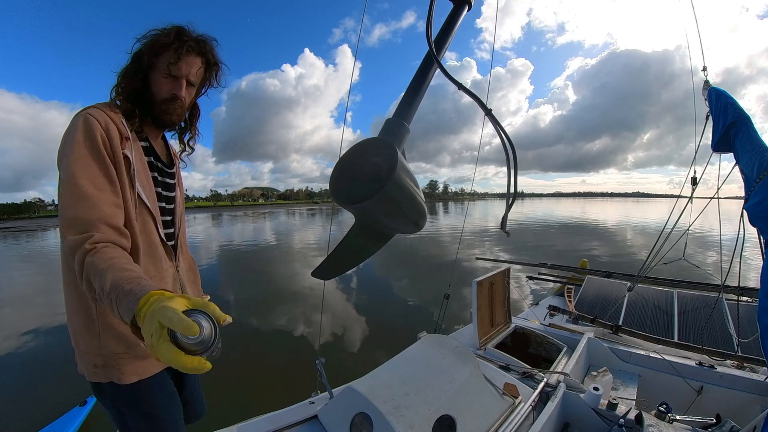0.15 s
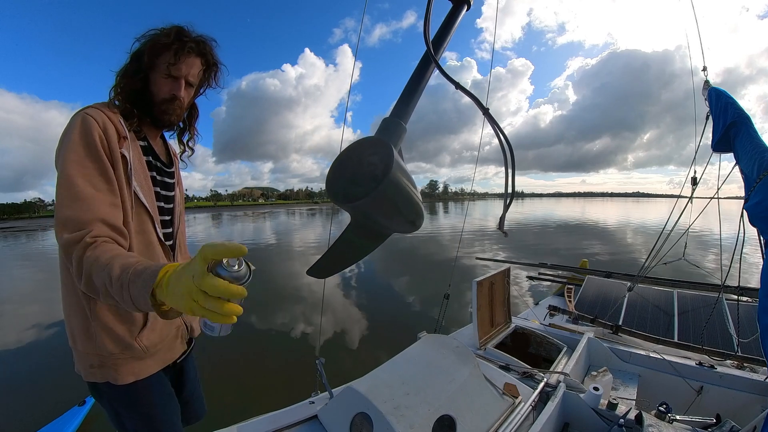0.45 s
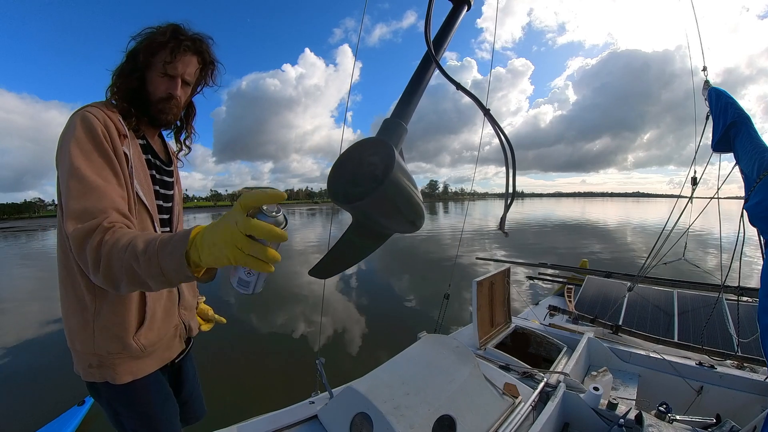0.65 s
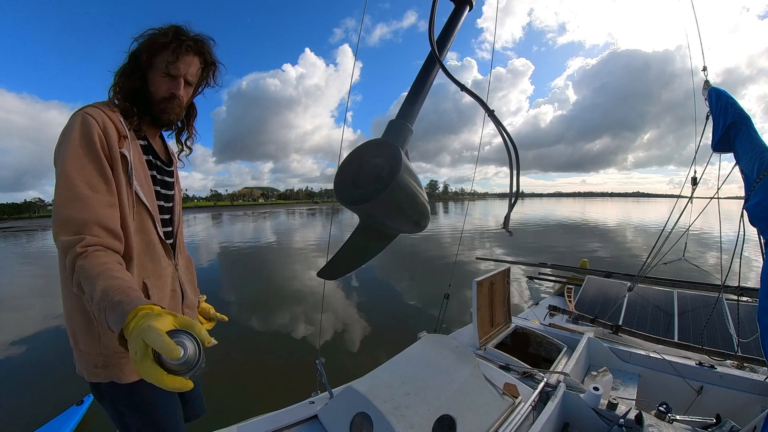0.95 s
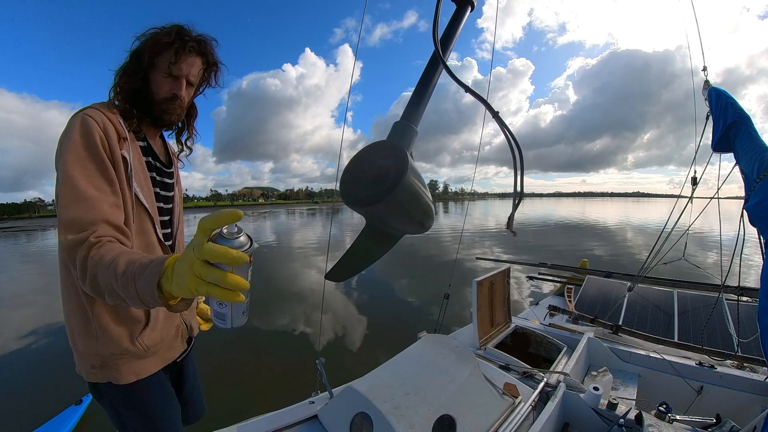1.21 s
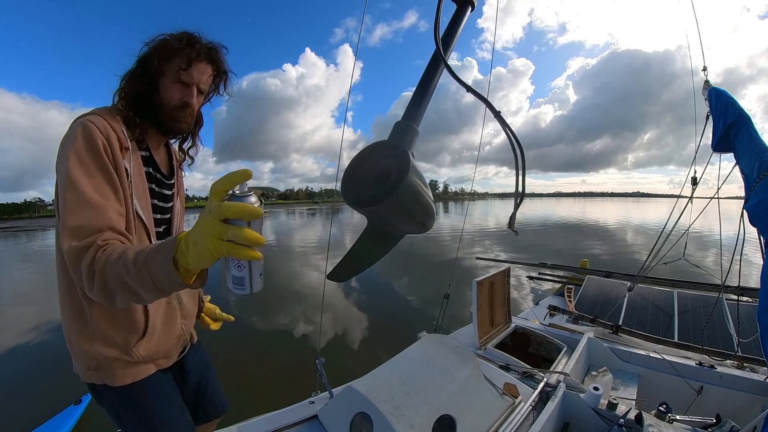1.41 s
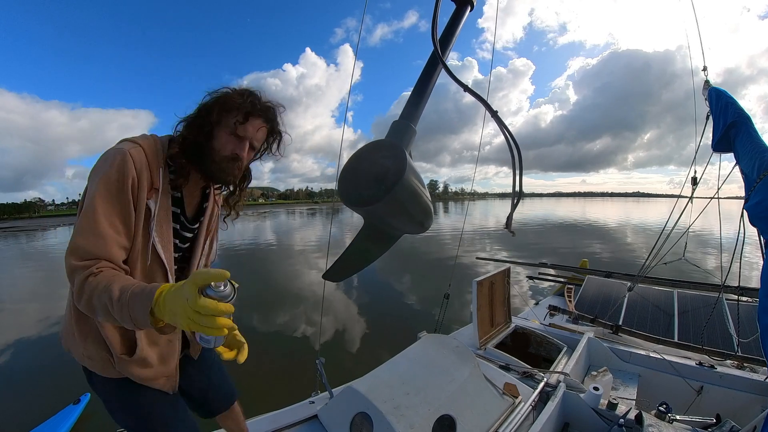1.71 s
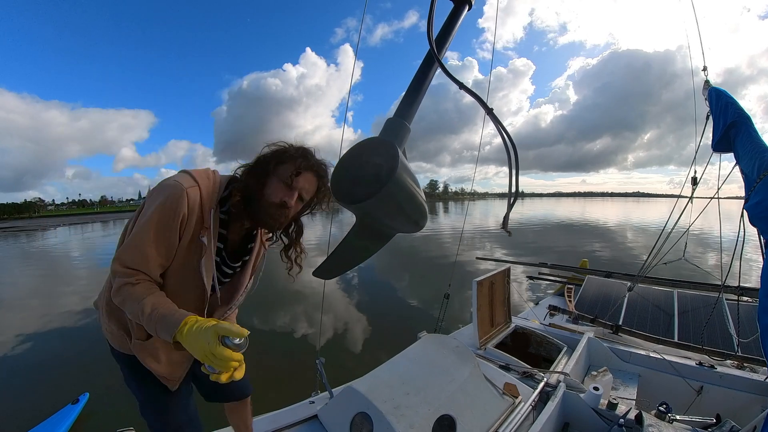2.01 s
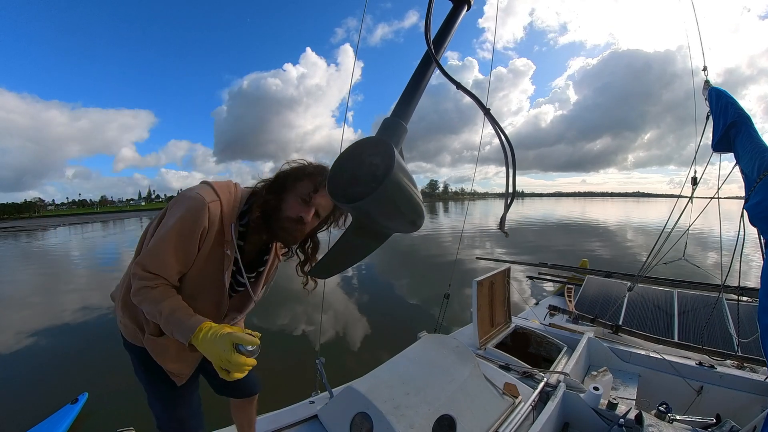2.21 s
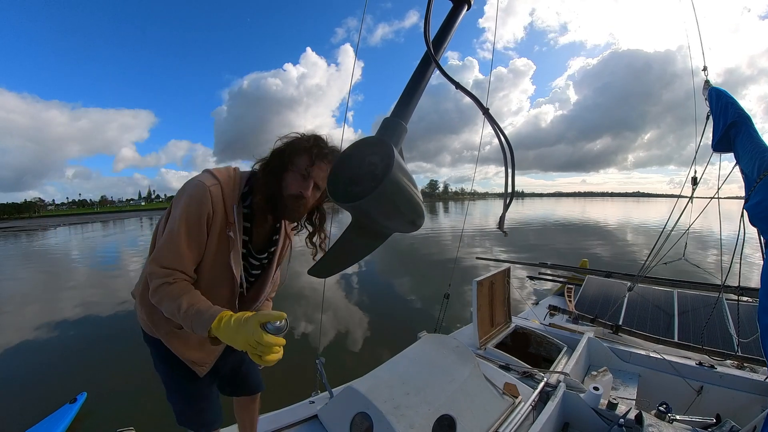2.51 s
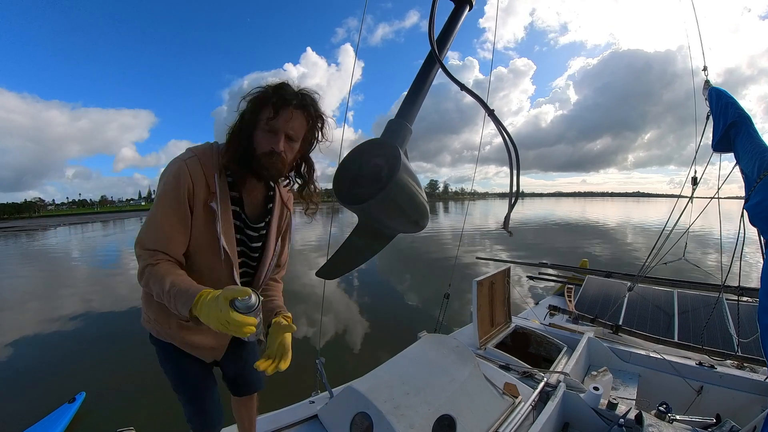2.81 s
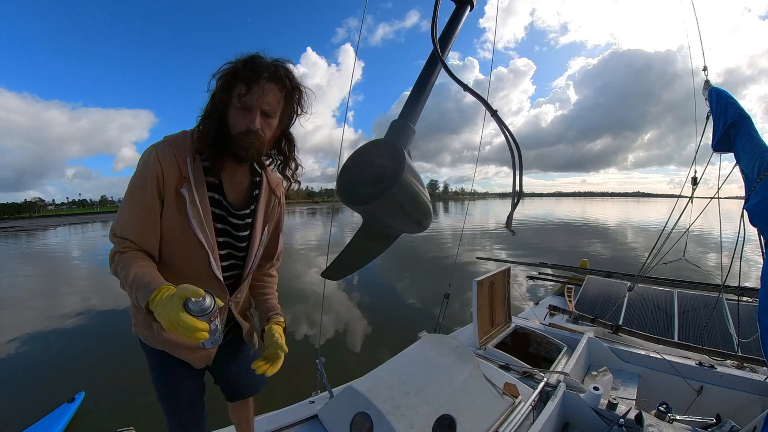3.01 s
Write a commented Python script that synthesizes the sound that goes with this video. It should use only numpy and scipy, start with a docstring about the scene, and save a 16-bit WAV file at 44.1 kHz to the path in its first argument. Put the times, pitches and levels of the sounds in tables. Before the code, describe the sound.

Close to the microphone on a boat deck, a spray can swishes and its ball rattles in tight metallic clusters; a far bird whistles, shoes scuff and a heel thumps, with low wind and a faint distant engine.

```python
"""A spray can is shaken on the deck of a boat on calm water, while wind and water rumble over a far engine.
Two hard down strokes make the paint rush and hiss (grainy coloured noise). After each, on the return,
the mixing ball rolls (dense ticks through resonances) and clacks (clicks ringing the can).
After the second stroke a far bird whistles once (a gliding sine), and the ball clacks again.
Soles and gear scuff the deck; near the end a heel thumps it, ringing its hollow modes."""
import sys
import numpy as np
from scipy import signal
from scipy.fft import rfft, irfft
from scipy.io import wavfile
from scipy.ndimage import uniform_filter1d

SR = 44100
rng = np.random.default_rng(int(sys.argv[2]) if len(sys.argv) > 2 else 0)


def transcribe(signal):
    """Save signal, clipped to [-1, 1], as a 16-bit WAV file at the path in sys.argv[1]."""
    frames = np.atleast_2d(signal).T
    limited = np.clip(frames, -1, 1)
    pcm = np.round(limited * 32767).astype(np.int16)
    wavfile.write(sys.argv[1], SR, pcm)


N = 138915  # length in samples


def from_db(db):
    """Turn decibels into a gain."""
    return 10 ** (np.asarray(db) / 20)


def rms_one(x):
    """Scale a sound to an rms of 1."""
    return x / np.sqrt(np.mean(x ** 2) + 1e-20)


def in_time(rows, outside=None):
    """Read each column of a table at every sample, with straight lines between the rows."""
    times, *columns = np.transpose(rows)
    now = np.arange(N) / SR
    return [np.interp(now, times, column, outside, outside) for column in columns]


def drift(rate_hz):
    """Smooth random wandering with a spread of 1; a higher rate wanders faster."""
    step = 40  # samples between the computed points
    r = np.exp(-2 * np.pi * rate_hz * step / SR)
    white = rng.standard_normal(N // step + 2002)
    slow = signal.lfilter([1], [1, -2 * r, r * r], white)[2000:]  # skip the filter's start
    slow = rms_one(slow - slow.mean())
    return np.interp(np.arange(N) / step, np.arange(len(slow)), slow)


def ring(clicks, hz, t60):
    """A resonance: each unit click starts a sine of height 1 that fades by 60 dB in t60 seconds."""
    r = from_db(-60 / (t60 * SR))
    w = 2 * np.pi * hz / SR
    return signal.lfilter([0, np.sin(w)], [1, -2 * r * np.cos(w), r * r], clicks + 1e-18)


def band(x, low_hz, high_hz):
    """Keep the pitches between two limits."""
    return signal.sosfilt(signal.butter(2, [low_hz, high_hz], "band", fs=SR, output="sos"), x)


def coloured(spectrum):
    """Steady noise with a given balance of pitches, at rms 1."""
    hz, db = np.transpose(spectrum)
    bins_hz = np.arange(1, N // 2 + 2) * SR / N
    gain = from_db(np.interp(np.log(bins_hz), np.log(hz), db))
    return rms_one(irfft(rfft(rng.standard_normal(N)) * gain, N))


def banded_noise(spectrum, patchy_db, rate_hz, count):
    """Noise in bands of 1/count octave, which swell partly together and partly alone; rms 1."""
    hz, db = np.transpose(spectrum)
    octaves = np.log2(hz[-1] / hz[0])
    edges = hz[0] * 2 ** np.arange(0, octaves + .5 / count, 1 / count)
    together = drift(rate_hz)
    white = rng.standard_normal((2, N + 8000))  # neighbouring bands use different noise
    out = 0
    for k, (low, high) in enumerate(zip(edges, edges[1:])):
        level = np.interp(np.log(low * high) / 2, np.log(hz), db)
        swell = patchy_db * (0.91 * together + drift(rate_hz))
        out = out + from_db(level + swell) * band(white[k % 2], low, high)[-N:]
    return rms_one(out)


def add(out, s, sound):
    """Mix a sound in at time s."""
    i = int(s * SR)
    out[i:i + len(sound)] += sound[:N - i]


def engine():
    """A far engine: noise through narrow resonances gives wavering multiples of its firing rate."""
    # multiples 2 to 6 of the firing rate: (time [s], level [dB] of each of the five)
    drone_levels = [(0, -63, -65, -52.5, -61.5, -57), (.6, -67.5, -54.5, -53.5, -62.5, -62.5),
                    (1.2, -57, -61.5, -51.5, -61.5, -64.5), (1.8, -58, -58.5, -66, -64.5, -59),
                    (2.4, -58, -54, -62, -58.5, -58), (3.15, -62, -55.5, -58.5, -60.5, -61)]
    firing_hz, width_hz = 27.85, 5
    t60 = np.log(1000) / (np.pi * width_hz)
    out = 0
    for k, db in enumerate(in_time(drone_levels)):
        tone = ring(rng.standard_normal(N + SR), firing_hz * (k + 2), t60)[SR:]  # already ringing
        out = out + from_db(db) * rms_one(tone)
    return out


def wind():
    """Wind and water: lumpy noise in three registers, each rising and falling on its own."""
    # (time [s], deep rumble [dB], rumble [dB], rustle [dB])
    gusts = [(0.0, -66.5, -51, -65.5), (0.39, -71.5, -50.5, -63.5), (0.6, -68, -49.5, -68),
             (0.97, -61.5, -51.5, -66), (1.39, -62, -61.5, -70), (1.89, -62, -48, -67.5),
             (2.01, -65, -52.5, -67.5), (2.38, -65.5, -51.5, -71.5), (2.62, -60, -46.5, -60.5),
             (2.8, -65, -51, -67), (2.97, -64, -52.5, -65), (3.15, -51, -51, -65)]
    # colour of each register in the same order: (pitch [Hz], level per Hz [dB])
    registers = [
        [(13, -38.5), (22, -12), (60, 0), (78, -33.5), (130, -120)],
        [(35, -31), (60, -3), (114, 2), (172, -8.5), (220, -17.5), (290, -39), (480, -120)],
        [(130, -28.5), (220, -4), (257, -2.5), (383, -17), (429, -12.5), (984, -25), (1200, -36), (1560, -66),
         (2640, -120)],
    ]
    out = 0
    for db, colour in zip(in_time(gusts), registers):
        out = out + from_db(db) * banded_noise(colour, patchy_db=2.5, rate_hz=5.1, count=3)
    return out


def far_hiss():
    """Far air and water: a steady coloured noise."""
    # (pitch [Hz], level per Hz [dB])
    air_colour = [(530, -28.5), (900, -1.5), (1020, -9), (1280, -7.5), (3230, -6), (5890, -5.5),
                  (7990, -13.5), (8560, -26), (9440, -28.5), (12300, -55.5), (20800, -120)]
    return from_db(-79.5) * coloured(air_colour)


def bird():
    """A far bird: one arched whistle, a gliding sine with a faint, unsteady octave above."""
    # (time [s], pitch [Hz], level [dB])
    whistle = [(1.405, 1816, -97), (1.417, 1920, -72.5), (1.433, 2020, -73), (1.473, 2087, -66),
               (1.571, 2036, -69.5), (1.619, 1916, -71), (1.625, 1884, -89), (1.67, 1930, -85)]
    phase = 2 * np.pi * np.cumsum(in_time(whistle)[0]) / SR
    octave_gain = from_db(-22 + 6.0 * drift(30.0))
    octave = octave_gain * np.sin(2 * phase + 2.4 * drift(40.0))
    level_db = in_time(whistle, -200)[1]  # silent before and after
    return np.sqrt(2) * from_db(level_db) * (np.sin(phase) + octave)


def rub(rows, ticks_per_s):
    """Something runs over a body: dense uneven ticks ring one region of it, under a short swell."""
    attack_s, edge_s = 0.0014, 0.018  # edge_s: half the length of the fade-out
    out = np.zeros(N)
    size = int(.3 * SR)
    for s, length, db, hz, t60 in rows:
        t = np.arange(int((length + .05) * SR)) / SR
        ticks = (rng.random(size) < ticks_per_s / SR) * rng.standard_normal(size)
        fade_in = np.clip(t / attack_s, 0, 1)
        fade_out = np.clip((length + edge_s - t) / (2 * edge_s), 0, 1) ** 2
        rough = rms_one(band(ring(ticks, hz, t60), hz / 2, min(hz * 2, 9600)))
        add(out, s, from_db(db) * fade_in * fade_out * rough[-len(t):])
    return out


def scuffs():
    """Soles and gear scuff the deck: very dense ticks ring parts of it."""
    # (start [s], length [s], level [dB], ring pitch [Hz], its t60 [s])
    scuff_rows = [(1.30, 0.033, -79.5, 1820, .02), (1.4, 0.054, -77, 820, 0.0059),
                  (1.866, 0.044, -59, 359, 0.074), (1.866, 0.038, -73.5, 1530, 0.008),
                  (1.862, 0.031, -73, 890, 0.0075), (2.065, 0.047, -70.5, 800, 0.014),
                  (2.12, 0.037, -72, 625, 0.09), (2.568, 0.049, -75.5, 1590, .015),
                  (2.57, 0.079, -64.5, 570, 0.0073), (2.943, .08, -67.5, 540, 0.0068),
                  (2.966, .03, -61.5, 695, 0.0095), (2.66, .04, -56.5, 850, 0.0029),
                  (2.70, 0.036, -63.5, 650, .004), (2.66, .065, -67.5, 1650, 0.0014),
                  (2.655, .03, -66, 2900, 0.0033), (2.655, 0.039, -73, 5500, .002),
                  (2.625, .035, -75, 1760, 0.0027)]
    return rub(scuff_rows, ticks_per_s=5000)


def thumps():
    """A heel lands in several touches; each strikes every mode of the hollow deck, low modes arriving later."""
    # touches of the heel: (time [s], level [dB], contact low-pass [Hz])
    heel_touches = [(2.6525, -39.5, 8000), (2.6557, -24.5, 4000), (2.6614, -33.5, 2500),
                    (2.665, -32.5, 600), (2.6765, -32.5, 400), (2.698, -33.5, 350)]
    # modes of the deck: (pitch [Hz], level [dB], t60 [s])
    deck_modes = [(133, -13.5, 0.2), (181.5, -9.5, 0.18), (246, -12, 0.046), (325, -4.5, 0.031),
                  (422, -1, 0.021), (551, -9, 0.05), (784, -9, 0.025), (1150, -15, 0.016),
                  (1540, -18, 0.018), (1936, -21, 0.018), (2460, -24.5, .012), (2850, -25.5, 0.018),
                  (4630, -28, .012), (6950, -28, 0.014)]
    lowest_hz, lowest_lag_s = deck_modes[0][0], 0.0091
    out = np.zeros(N)
    click = np.zeros(SR // 2)
    click[0] = 1
    for s, db, contact_hz in heel_touches:
        push = signal.lfilter(*signal.butter(1, contact_hz, fs=SR), click)
        for hz, level_db, t60 in deck_modes:
            lag_s = lowest_lag_s * (lowest_hz / hz) ** 3
            add(out, s + lag_s, -from_db(db + level_db) * ring(push, hz, t60))
    return out


def ball_rolls():
    """The mixing ball rolls along the wall of the can: dense ticks ring parts of it."""
    # (start [s], length [s], level [dB], ring pitch [Hz], its t60 [s])
    roll_rows = [(.323, 0.069, -75.5, 3480, .004), (.345, .075, -68.5, 3990, 0.0051),
                 (0.433, 0.04, -61, 5300, 0.0052), (0.701, 0.05, -75, 4350, .015),
                 (1.03, 0.085, -71.5, 4520, 0.0086), (1.058, .04, -73.5, 2600, .025),
                 (1.058, 0.061, -71.5, 3340, 0.017), (1.116, 0.075, -63, 5000, 0.0033),
                 (1.115, .07, -65, 2840, 0.0063), (1.125, .05, -70, 1630, .015),
                 (1.125, .05, -65.5, 772, .03), (1.89, 0.087, -79.5, 4570, 0.0098),
                 (1.969, 0.063, -68, 4260, 0.0031), (1.983, .04, -74.5, 2500, 0.022),
                 (2.275, .05, -71, 4330, 0.035), (1.442, 0.051, -85, 7940, 0.018),
                 (1.992, 0.023, -70.5, 7890, 0.0068), (.435, .04, -65, 1200, 0.0041),
                 (.11, 0.028, -73, 4700, .01), (.375, 0.047, -62.5, 3900, .006),
                 (1.148, 0.045, -65, 4500, 0.0048)]
    return rub(roll_rows, ticks_per_s=1500)


def clacks():
    """The ball hits the wall and rebounds: a snap, a short ring, a brighter ring, the can's modes and a tail."""
    # strikes: (time [s], peak level [dB], main ring [Hz], its t60 [s], snap [dB], bright ring [dB])
    strikes = [(0.0835, -55, 4740, 0.005, -9, -20), (0.379, -51.5, 3940, 0.007, -12, -20),
               (0.4173, -38, 4000, 0.006, -30, -13), (0.4328, -43.5, 5200, 0.009, -13, -21),
               (0.4474, -29, 4050, 0.0076, -19, -11), (0.4614, -33, 4040, 0.007, -18, -9),
               (0.718, -55.5, 4370, 0.006, -3, -20), (1.1131, -39.5, 3870, 0.0053, -6.5, -8),
               (1.1241, -42.5, 5420, 0.0047, -10, -21), (1.148, -36.5, 3850, 0.0067, -10, -11),
               (1.167, -56, 4430, 0.006, -18, -15), (1.4391, -62, 7870, 0.006, -5, -24),
               (1.969, -47, 4050, 0.0066, -18, -11), (1.984, -54, 4550, 0.012, -20, -15),
               (1.9935, -40, 4130, 0.0088, -18, -8.5), (2.004, -45.5, 4150, 0.0076, -23, -10),
               (2.0096, -48, 4200, 0.006, -25.5, -12), (2.2631, -56.5, 4460, 0.023, -14, -22),
               (2.2722, -49.5, 4410, 0.025, -20, -21), (2.29, -59.5, 4400, 0.028, -29, -25)]
    # modes of the can: (pitch [Hz], level [dB], t60 [s])
    can_modes = [(1015, -21.5, 0.077), (1710, -22.5, 0.041), (2590, -30, 0.04), (3440, -24.5, 0.054),
                 (4300, -9.5, 0.013), (4425, -3, 0.058), (5400, -19.5, 0.025), (6100, -9, 0.058),
                 (7100, -20, 0.018), (7500, -19.5, 0.036)]
    rebound_s, rebound_loss_db = .0036, 8  # typical gap and loss at each of three rebounds
    bright_hz, bright_t60_s = 6500, .004
    can_db = 3.5  # added to the level of every mode
    tail_db, tail_t60_s = -18, 0.11
    contact_filter = signal.butter(3, 7440, fs=SR)  # low-pass [Hz]
    out, size = np.zeros(N), int(.25 * SR)
    t = np.arange(size) / SR
    for s, db, hz, ring_t60, snap_db, bright_db in strikes:
        luck = rng.standard_normal(len(can_modes) + 6)  # small differences from strike to strike
        hit = np.zeros(size)
        hit[0] = 1
        for k in range(1, 4):
            delay_s = k * rebound_s * (1 + .12 * luck[k])
            hit[int(delay_s * SR)] = from_db(-rebound_loss_db * k + 2.0 * luck[k + 2])
        sound = 2 * band(ring(hit, hz, ring_t60), 0.58 * hz, 1.21 * hz + 400)
        sound += 3 * from_db(snap_db) * band(hit, 2000, 5100)
        bright = ring(hit, bright_hz * (1 + 0.039 * luck[0]), bright_t60_s)
        sound += 2 * from_db(bright_db) * band(bright, 5400, 7600)
        for (mode_hz, level_db, t60), chance in zip(can_modes, luck[6:]):
            gain = from_db(snap_db + can_db + level_db + 2 * chance)
            sound += gain * ring(hit, mode_hz * (1 + 0.014 * chance), t60)
        tail = rms_one(band(rng.standard_normal(size), 0.73 * hz, min(1.5 * hz, 9500)))
        sound += from_db(tail_db - 60 * t / tail_t60_s) * tail
        sound = signal.lfilter(*contact_filter, sound)
        add(out, s, from_db(db) * sound / np.abs(sound).max())
    return out


def rushes():
    """Paint rushes through the can: bright grainy noise that slides from one colour to another in each stroke."""
    # one table a stroke: (time [s], level [dB])
    strokes = [
        [(0.112, -83), (0.121, -65), (0.132, -60), (0.14, -46.5), (0.161, -38.5), (0.195, -39), (0.255, -45),
         (0.28, -68), (0.31, -84)],
        [(0.835, -79), (0.855, -63), (0.867, -47.5), (0.917, -43), (0.963, -45.5), (0.985, -71), (1.01, -76)],
    ]
    # for each stroke an early and a late colour: (pitch [Hz], level per Hz [dB])
    stroke_colours = [
        [[(350, -49), (600, -16), (909, -36.5), (1360, -12.5), (2130, -24.5), (2230, -17), (3460, -3.5),
         (4670, -10.5), (5060, -13.5), (6680, 2), (7160, -3), (7410, -16.5), (9440, -27), (12300, -49),
         (20800, -120)], [(350, -62), (600, -21.5), (848, -20.5), (985, -17), (1270, -6), (2080, -25),
         (2210, -15), (2780, -13.5), (3230, -5), (5180, -16.5), (6530, -0.5), (8030, -14.5), (9440, -43),
         (12300, -73), (20800, -120)]],
        [[(240, -45), (400, -26), (501, -8), (885, -27), (996, -19), (1230, -20), (1480, -26), (1580, -16),
         (2120, -15), (3890, -6), (5270, -13), (6690, 5.5), (9440, -35), (12300, -63), (20800, -120)],
         [(240, -44), (400, -8.5), (627, -22), (806, -10.5), (996, -14), (1280, -9), (1830, -18.5),
         (3070, -2.5), (4870, -12.5), (5270, -17), (6180, 2.5), (8050, -15.5), (9440, -28), (12300, -57),
         (20800, -120)]],
    ]
    flicker_db, grain_db = 1.0, 1.5
    out = 0
    for rows, (early, late) in zip(strokes, stroke_colours):
        start_s, end_s = rows[0][0], rows[-1][0]
        # share of the late colour; it is held at 0 and 1 near the ends of the stroke
        share = np.clip(in_time([(start_s, -.4), (end_s, 1.4)])[0], 0, 1)
        noise = np.sqrt(1 - share) * coloured(early) + np.sqrt(share) * coloured(late)
        level_db = in_time(rows, -200)[0]  # silent outside the stroke
        wobble_db = flicker_db * drift(53.0) + grain_db * drift(300.0)
        out = out + from_db(level_db + wobble_db) * noise
    return out


def stereo_side(hiss):
    """Width: fresh noise follows the level of the hiss's upper middle and goes opposite ways left and right."""
    steep = signal.butter(6, [3250, 4900], "band", fs=SR, output="sos")
    power = uniform_filter1d(signal.sosfilt(steep, hiss) ** 2, size=600)
    level = np.sqrt(np.abs(power))
    return from_db(-7) * level * rms_one(signal.sosfilt(steep, rng.standard_normal(N)))


def scene():
    """Mix all the sources in the middle; only the upper middle of the hiss is wide."""
    hiss = far_hiss() + rushes()
    background = engine() + wind() + bird()
    mid = background + scuffs() + thumps() + ball_rolls() + clacks() + hiss
    side = stereo_side(hiss)
    return np.array([mid + side, mid - side])


def record(dry):
    """Cut the top steeply, then add a trace of self-noise, which is heard above the cut too."""
    stop_hz, self_noise_db = 9843, -101  # from stop_hz up, at least 50 dB is taken away
    cut = signal.sosfilt(signal.cheby2(16, 50, stop_hz, fs=SR, output="sos"), dry)
    return cut + from_db(self_noise_db) * rng.standard_normal(dry.shape)


dry = scene()
out = record(dry)
transcribe(out)
```